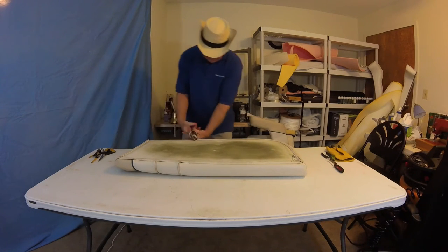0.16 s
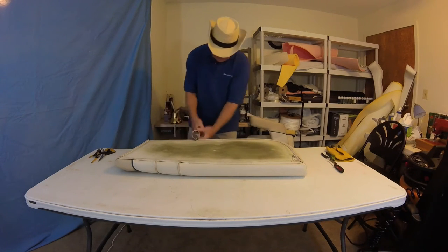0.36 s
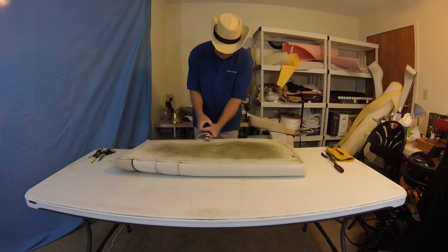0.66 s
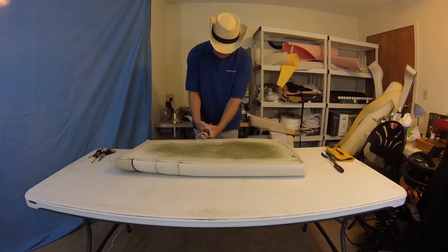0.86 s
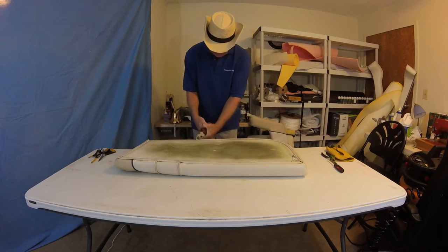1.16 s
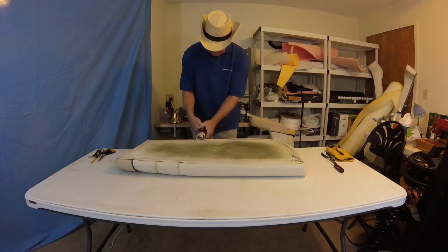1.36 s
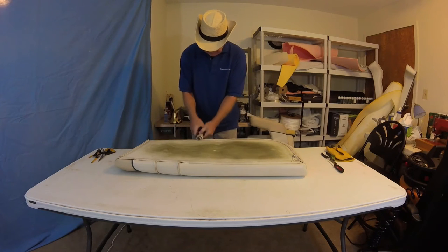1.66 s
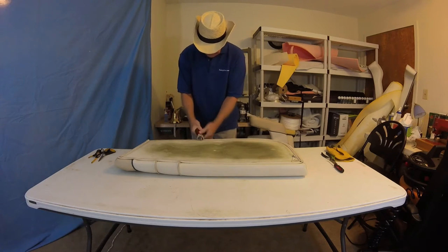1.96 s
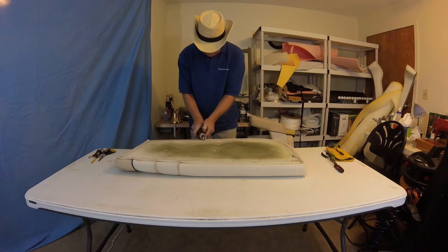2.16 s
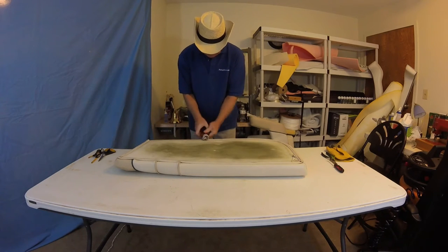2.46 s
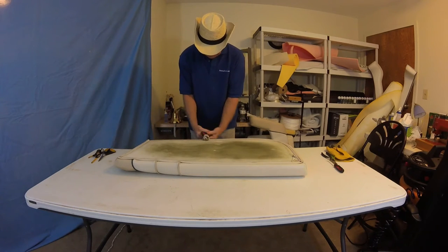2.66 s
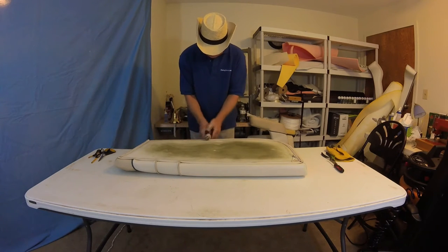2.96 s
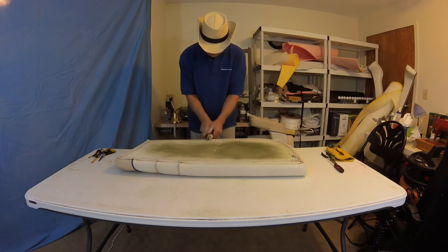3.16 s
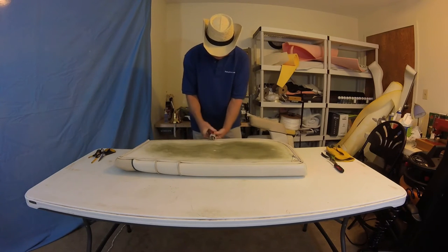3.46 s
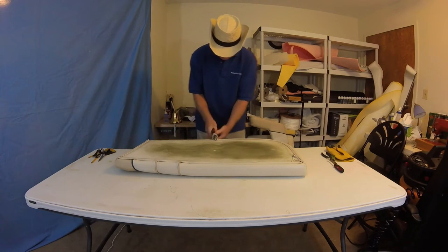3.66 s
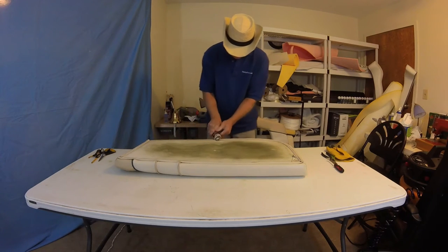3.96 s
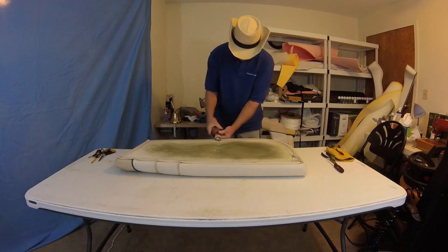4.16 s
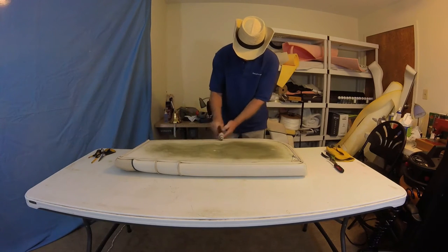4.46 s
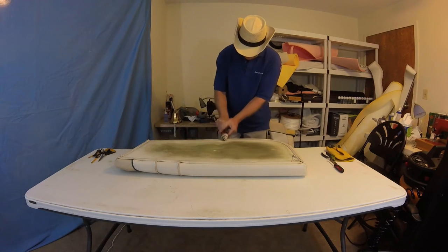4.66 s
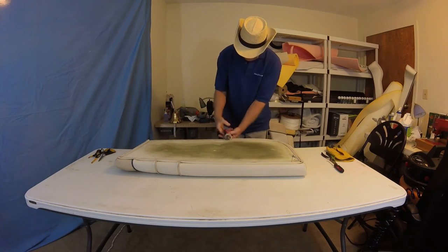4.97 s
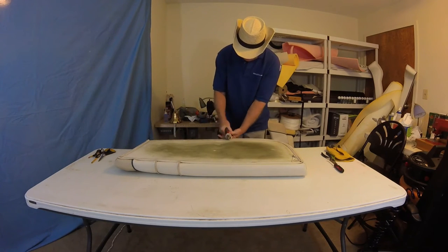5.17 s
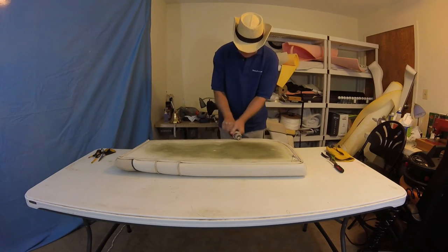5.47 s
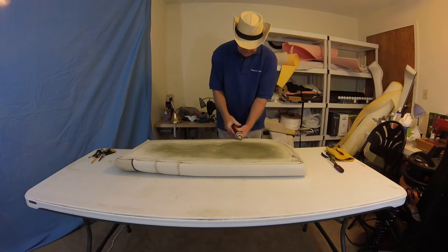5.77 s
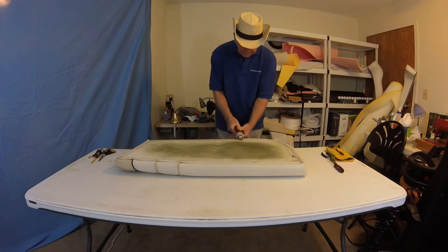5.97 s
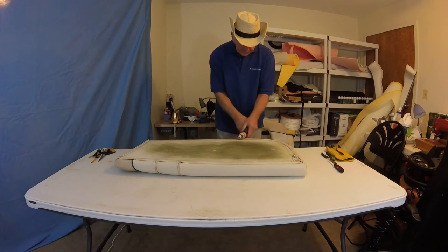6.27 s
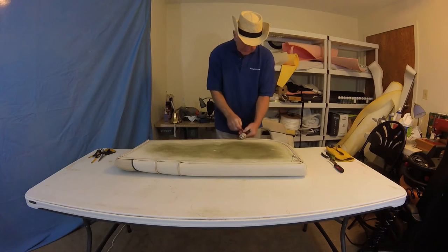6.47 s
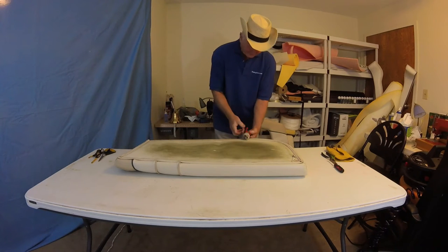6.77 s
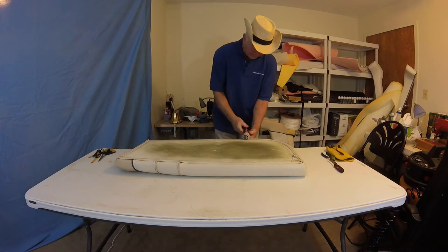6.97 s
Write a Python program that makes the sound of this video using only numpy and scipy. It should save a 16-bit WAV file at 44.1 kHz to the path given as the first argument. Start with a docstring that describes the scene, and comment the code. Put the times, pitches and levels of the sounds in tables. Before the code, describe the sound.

A small indoor workshop hums with low rumble and soft hiss. Faint hand and cloth rubbing and a dull thump at 0.7 s come first, then a tiny tick at 1.0. At 1.7 a light double snap begins the staple pulling; a stronger pair at 2.1 knocks hollow wood and rings the steel tool. After a soft bump at 2.7, a hard rapid cluster with a brief rasp cracks at 2.95. Single snaps follow at 3.25 and 3.5, then a bright scratchy pull at 3.8, another snap at 4.2 and a dense rattling burst from 4.45 to 4.6. A weaker click comes at 4.9, a firm double at 5.4, and dull taps at 5.6 and 5.9. Small ticks lead to a double snap at 6.5, a heavy bump with table thud at 6.6, and a last tick near 7.05. Short, sharp reflections surround each hit, heard from a few metres.

```python
"""First comes the quiet rumble and hiss of a small workshop, with one soft thump and faint rubbing.
Then a steel staple puller levers staples out of an upholstered wooden panel on a folding table.
Each slip cracks, rings the tool and knocks the wood; long pulls rasp as staple legs drag through fibres.
Noise makes the hiss, rubbing and cracks; fading sine waves make the rings, knocks and table thumps.
The room answers with sharp echoes, heard by one microphone a few metres off."""
import sys
import numpy as np
from scipy import signal
from scipy.fft import rfft, irfft
from scipy.io import wavfile
from scipy.ndimage import uniform_filter1d, map_coordinates

SR = 44100
rng = np.random.default_rng(int(sys.argv[2]) if len(sys.argv) > 2 else 0)


def master_out(mix):
    """Clip the mix to full scale and print it as 16-bit PCM to the path in sys.argv[1]."""
    frames = np.transpose(np.atleast_2d(mix))
    ceiling = np.clip(frames, -1, 1)
    pcm = np.round(ceiling * 32767).astype(np.int16)
    wavfile.write(sys.argv[1], SR, pcm)


N = 313992  # length in samples

# Rumble and hiss of the room: (frequency [Hz], relative level per Hz [dB])
ROOM_NOISE = [(12, -8), (20, 2), (80, -8), (124, -12.5), (155, -13), (211, -18.5), (286, -19.5), (525, -27),
              (865, -29.5), (1270, -32.5), (2280, -37.5), (2620, -37.5), (11400, -53.5), (13800, -61.5),
              (15000, -86)]
# A very faint noise that differs between left and right: (frequency [Hz], relative level per Hz [dB])
SIDE_NOISE = [(30, -3.5), (120, -9), (400, -12.5), (2000, -18.5), (7000, -21), (13000, -28)]
# Echoes off ceiling, walls and shelves: (delay [s], level before the send's own echo level [dB])
ECHOES = [(.0049, 0), (.0132, -5), (.0205, -9), (.0254, -1), (.0687, -14)]
# How long the room rings on: (frequency [Hz], time to fall by 60 dB [s])
ROOM_DECAY = [(100, 0.34), (700, 0.2), (2000, 0.27), (5000, 0.35), (8000, 0.34), (13000, 0.25)]
# Hand activity, the base for cloth and taps: (time [s], level [dB])
HAND_ACTIVITY = [(0.3, -57), (1.5, -61), (2.6, -61), (3.95, -53), (4.7, -54.5), (5.5, -56), (6.15, -59),
                 (6.5, -52), (6.85, -61)]
# Colour of the rubbed upholstery: (frequency [Hz], relative level per Hz [dB])
CLOTH_COLOUR = [(80, -20), (250, -4.5), (500, -4), (950, -4), (1600, -15), (3200, -17), (8000, -24.5),
                (15000, -45)]
# The panel rocks the table: (time [s], frequency [Hz], starting level [dB])
TABLE_THUMPS = [(0.0, 119, -36), (0.671, 162, -37), (0.676, 77, -36), (2.114, 142, -28.5),
                (2.958, 196, -29), (3.486, 150.2, -33.5), (3.74, 57.3, -40), (4.477, 287.3, -29.5),
                (4.916, 91, -34.5), (5.359, 109.4, -32.5), (5.386, 103.6, -35), (6.633, 94, -26)]
# Hand and tool come down dully on the panel: (time [s], level [dB])
BUMPS = [(0.673, -28.5), (2.73, -24.5), (3.736, -28), (5.628, -27), (5.894, -29.5), (6.6295, -14)]
# The jaw feels for a staple or slips a little: (time [s], level [dB])
TICKS = [(0.9842, -41), (3.2451, -32), (3.4304, -39), (3.7896, -32), (4.2291, -33), (4.8264, -40),
         (4.8505, -41.5), (5.2291, -39), (5.258, -41.5), (5.3052, -33.5), (5.7658, -41.5), (5.8358, -41),
         (6.2811, -39), (6.3745, -36.5), (7.0535, -35)]
# Staple legs drag out of the wood:
# (start [s], length [s], crackle level [dB], wood level [dB], brightness [dB per octave, well above 1 kHz])
PULLS = [(2.954, 0.036, -26.5, -12, 3), (3.805, 0.041, -22.5, -13, 13), (4.451, 0.045, -19.5, -9, 5),
         (4.512, .044, -27.5, -16, 3)]
# A staple gives way under the lever: (time [s], wood knock level [dB], crack level before a 0.5 dB cut [dB],
# steel ring level [dB], ring centre [Hz], knock centre [Hz])
SNAPS = [(1.709, -17, -35.5, -36, 3200, 760), (1.7449, -18, -40.5, -48, 3130, 850),
         (2.0714, -17.5, -35.5, -29.5, 3060, 880), (2.1016, -10, -23.5, -18, 3300, 1070),
         (2.9435, -9, -21.5, -28.5, 3110, 895), (2.9621, -9, -19, -20.5, 2630, 850),
         (2.9677, -15.5, -17.5, -28, 2830, 915), (3.251, -14, -27, -26.5, 3040, 800),
         (3.4824, -9.5, -20.5, -20.5, 2750, 1080), (3.8038, -14.5, -21, -18.5, 3000, 636),
         (3.8306, -13.5, -21.5, -36, 2940, 940), (4.2352, -11.5, -22, -23, 3420, 915),
         (4.4468, -11, -26.5, -25, 2930, 800), (4.5146, -10, -22, -21, 3150, 950),
         (4.5286, -12, -32, -30, 2990, 824), (4.5566, -15.5, -25.5, -44, 3200, 840),
         (4.9425, -19.5, -34, -27.5, 3570, 940), (5.3668, -11, -22.5, -19.5, 2930, 690),
         (5.3904, -11, -28, -42, 3300, 716), (6.5079, -16, -32, -33, 3330, 850),
         (6.5329, -11.5, -25.5, -19, 3300, 1140)]
# Knock tones of the wooden panel: (frequency [Hz], width [Hz], relative level [dB])
WOOD_MODES = [(639, 93, 1), (870, 54, 1.5), (1027, 118, -2), (1420, 157, -8.5), (2070, 390, -17.5)]
# Deeper tones of the panel's body: (frequency [Hz], width [Hz], relative level [dB])
BODY_MODES = [(215, 144, -1), (283.4, 61, 2.5), (374, 220, -10)]
# Ringing tones of the steel tool: (frequency [Hz], width [Hz], relative level [dB])
STEEL_MODES = [(2475, 186, 1.5), (2666, 310, 0), (3315, 226, 1.5), (3556, 180, 1), (4520, 610, -5.5),
               (4900, 200, -3)]
# Ringing tones of the staple wire: (frequency [Hz], width [Hz], relative level [dB])
WIRE_MODES = [(6240, 49, -15), (6850, 82, 12), (7050, 190, -21), (7810, 190, 6), (8760, 70, -13),
              (9670, 98, 1)]
# Colour of splintering fibres: (frequency [Hz], relative level per Hz [dB])
CRACK_COLOUR = [(300, -19), (1500, 6), (2300, 5), (4000, 5), (5500, 7), (7000, 9.5), (8200, 6), (9500, -1),
                (12000, -2.5), (15000, -14)]

ROOM_NOISE_DB, SIDE_NOISE_DB = -47.5, -90
TOP_HZ = 15200  # nothing is kept from here up
THUMP_T60_S = 0.22  # time for a thump to fall by 60 dB
LIGHT_RING_HZ, LIGHT_KNOCK_HZ = 3260, 830  # ring and knock centres of ticks and bumps
BUMP_CRACK_DB, BUMP_STEEL_DB, BUMP_BODY_DB = -28.5, -23.5, 6.5  # relative to a bump's knock
TICK_CRACK_DB, TICK_STEEL_DB, TICK_WOOD_DB, TICK_BODY_DB = 0.5, -0.5, 10, 13.5  # relative to the tick
PULL_STEEL_DB = -3  # tool ring, relative to the crackle
HEAVY_DB, HEAVY_BODY_DB = -8.5, 2.5  # a heavy knock, and its body's level relative to it
FLEX = 0.77  # dB the body falls behind for each dB a knock is weaker than heavy


def amp(db):
    """Turn decibels into a gain."""
    return 10 ** (np.asarray(db) / 20)


def unit(x):
    """Scale a sound to an rms level of 1."""
    return x / np.sqrt(np.mean(x ** 2) + 1e-20)


def along(points, hz):
    """Read a (frequency, value) curve, with frequency on a log axis."""
    f, v = np.transpose(points)
    return np.interp(np.log(hz + 1), np.log(f), v)


def wobble(rate):
    """Draw a smooth random curve with rate knots a second."""
    knots = rng.standard_normal(int(N * rate / SR) + 4)
    return map_coordinates(knots, [np.arange(N) * rate / SR])


def add(track, s, sound):
    """Mix a sound into the track at time s in seconds."""
    part = track[max(round(s * SR), 0):][:len(sound)]
    part += sound[:len(part)]


def noise(colour):
    """Shape random noise by a colour curve, at an rms level of 1."""
    gain = amp(along(colour, np.fft.rfftfreq(N, 1 / SR)))
    return unit(irfft(rfft(rng.standard_normal(N)) * gain, N))


def in_room(x, echo_db, tail_db, build=0.0031, sparse_db=7, merge=0.053):
    """Add echoes and a tail whose scattered reflections merge into a smooth wash."""
    age = np.arange(SR // 2) / SR
    # early reflections are uneven in strength, later ones even
    spread = amp(sparse_db * np.exp(-age / merge) * rng.standard_normal(len(age)))
    local_rms = np.sqrt(uniform_filter1d(spread ** 2, size=600))
    scatter = rng.standard_normal(len(age)) * spread / local_rms
    hz, t, z = signal.stft(scatter, SR, nperseg=256)
    decay = amp(-60 * t / along(ROOM_DECAY, hz)[:, None])
    tail = signal.istft(z * decay * (1 - np.exp(-t / build)), SR, nperseg=256)[1]
    response = amp(tail_db) * tail / np.linalg.norm(tail)
    response[0] += 1  # direct sound
    for delay, db in ECHOES:
        add(response, delay, amp([db + echo_db]))
    return signal.fftconvolve(x, response)


def radiate(low, high):
    """Broad panel knocks arrive mostly direct; tool clicks mostly off ceiling and walls."""
    return in_room(low, echo_db=-19.5, tail_db=0) + in_room(high, echo_db=2, tail_db=5.0)


def ring(modes, scatter_db, detune, centre_hz=1000, focus_db=0, size=4096):
    """Sum fading tones to energy 1; the contact point favours those near a centre (focus in dB per octave)."""
    t = np.arange(size) / SR
    hz, width, db = np.transpose(modes)[:, :, None]
    strength, shift = rng.standard_normal((2, len(modes), 1))
    sign = (-1) ** np.arange(len(modes))[:, None]  # neighbouring tones swing in opposite directions
    octaves_off = np.abs(np.log2(hz / centre_hz))
    gain = sign * width * amp(db + scatter_db * strength - focus_db * octaves_off)
    fade = np.exp(-np.pi * width * t)  # a wider tone fades sooner
    wave = np.sum(gain * fade * np.sin(2 * np.pi * hz * (1 + detune * shift) * t), 0)
    return wave / np.linalg.norm(wave)


def crack(ragged_db, tilt_db=0, size=4096, count=90):
    """Fibres split in a click of energy 1 with its own ragged colour, tilted in dB per octave."""
    hz = np.fft.rfftfreq(size, 1 / SR)
    ragged = np.interp(hz, np.linspace(0, SR / 2, count), rng.standard_normal(count))
    level_db = along(CRACK_COLOUR, hz) + ragged_db * ragged + tilt_db * np.log2(1 + hz / 1000)
    # folding the cepstrum (the spectrum of the log spectrum) makes the click start at once
    cepstrum = irfft(np.log(amp(level_db)))
    wave = irfft(np.exp(rfft(2 * cepstrum[:size // 2], size)))
    return wave / np.linalg.norm(wave)


def fracture(t60, after_db, size=512):
    """A break is one sharp slip and a brief run of tiny ones; energy 1."""
    run = rng.standard_normal(size) * amp(-60 * np.arange(size) / SR / t60)
    run *= amp(after_db) / np.linalg.norm(run)
    run[0] = 1
    return run / np.linalg.norm(run)


def contact(wood_db, body_db, crack_db, steel_db, ring_hz, knock_hz):
    """Tool, staple and panel meet: one row of wood knock, one of crack with wire and tool ring, no room."""
    knock = amp(wood_db) * ring(WOOD_MODES, scatter_db=1.0, detune=0.0048, centre_hz=knock_hz, focus_db=10.5)
    body = amp(body_db) * ring(BODY_MODES, scatter_db=3.5, detune=0.012)
    steel = amp(steel_db) * ring(STEEL_MODES, scatter_db=0.5, detune=0.0099, centre_hz=ring_hz, focus_db=9)
    splinter = np.convolve(crack(ragged_db=1.5), fracture(t60=0.003, after_db=-4))[:len(knock)]
    wire = ring(WIRE_MODES, scatter_db=3.5, detune=0.006)
    click = amp(crack_db) * (splinter + amp(-14.5) * wire)
    return np.array([knock + body, steel + click])


def room_noise():
    """The air of the room is a steady coloured noise."""
    return amp(ROOM_NOISE_DB) * noise(ROOM_NOISE)


def side_noise():
    """A very faint coloured noise, to be added on the left and subtracted on the right."""
    return amp(SIDE_NOISE_DB) * noise(SIDE_NOISE)


def rubbing(count=70):
    """Hands and tool shift on the upholstery as wavering noise, with soft random taps on the panel."""
    level_db = np.interp(np.arange(N) / SR, *np.transpose(HAND_ACTIVITY))
    taps = np.zeros(N)
    for place, force in rng.random((count, 2)):
        at = int(place * (N - 1))
        tap_db = level_db[at] + 15.0 + 8.1 * force
        add(taps, at / SR, amp(tap_db) * ring(WOOD_MODES, scatter_db=5.5, detune=0.064))
    cloth = amp(level_db - 4.5 + 3.94 * wobble(rate=16)) * noise(CLOTH_COLOUR)
    return cloth + in_room(taps, echo_db=-3.0, tail_db=1.5)[:N]


def thumps(rise=0.00094):
    """The released lever force rocks the table top, which booms as a brief fading tone."""
    out, t = np.zeros(N), np.arange(SR // 2) / SR
    for s, hz, db in TABLE_THUMPS:
        envelope = amp(db - 60 * t / THUMP_T60_S) * (1 - np.exp(-t / rise))
        add(out, s, envelope * np.sin(2 * np.pi * hz * t))
    return out


def bumps():
    """Cushioned contacts move mostly wood and panel body, hardly any steel."""
    out = np.zeros(N)
    for s, db in BUMPS:
        bump = contact(0, BUMP_BODY_DB, BUMP_CRACK_DB, BUMP_STEEL_DB, LIGHT_RING_HZ, LIGHT_KNOCK_HZ)
        add(out, s, amp(db) * radiate(*bump))
    return out


def ticks():
    """Light touches of steel on staple share the same settings, each with its own strength."""
    out = np.zeros(N)
    for s, db in TICKS:
        tick = contact(TICK_WOOD_DB, TICK_BODY_DB, TICK_CRACK_DB, TICK_STEEL_DB,
                       LIGHT_RING_HZ, LIGHT_KNOCK_HZ)
        add(out, s, amp(db) * radiate(*tick))
    return out


def pulls(count=14):
    """Staple legs stick and slip: a dense, uneven volley of cracks and knocks keeps the tool ringing."""
    out = np.zeros(N)
    for s, length, crackle_db, wood_db, bright_db in PULLS:
        knocks, cracks = np.zeros((2, SR // 4))
        moments = length * (np.arange(count) + rng.random(count)) / count
        sizes = unit(amp(4.5 * rng.standard_normal(count))) / np.sqrt(count)
        for moment, size in zip(moments, sizes):
            wood = ring(WOOD_MODES, scatter_db=2, detune=0.015)
            body = ring(BODY_MODES, scatter_db=2, detune=0.02)
            add(knocks, moment, size * (wood + body))
            add(cracks, moment, size * crack(ragged_db=2, tilt_db=bright_db))
            steel = ring(STEEL_MODES, scatter_db=2, detune=0.01)
            add(cracks, moment, size * amp(PULL_STEEL_DB) * steel)
        add(out, s, radiate(amp(wood_db) * knocks, amp(crackle_db) * cracks))
    return out


def snaps():
    """A staple gives way; the heavier the knock, the more the whole panel flexes."""
    out = np.zeros(N)
    for s, wood_db, crack_db, steel_db, ring_hz, knock_hz in SNAPS:
        body_db = wood_db + HEAVY_BODY_DB + FLEX * (wood_db - HEAVY_DB)
        snap = contact(wood_db, body_db, crack_db - 0.5, steel_db, ring_hz, knock_hz)
        add(out, s, radiate(*snap))
    return out


def scene():
    """Mix the work sounds over the room noise, the same left and right but for a very faint noise of opposite
    sign."""
    background = room_noise() + rubbing() + thumps()
    tool_work = bumps() + ticks() + pulls() + snaps()
    mono = background + tool_work
    side = side_noise()
    return np.array([mono + side, mono - side])


def record(dry):
    """Cut off everything from the top frequency up."""
    keep = np.fft.rfftfreq(N, 1 / SR) < TOP_HZ
    return irfft(rfft(dry) * keep, N)


dry = scene()
out = record(dry)
master_out(out)
```